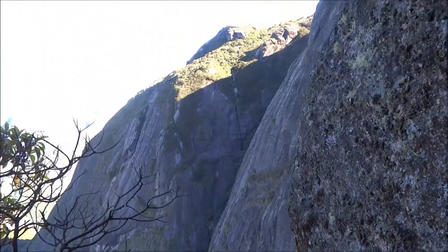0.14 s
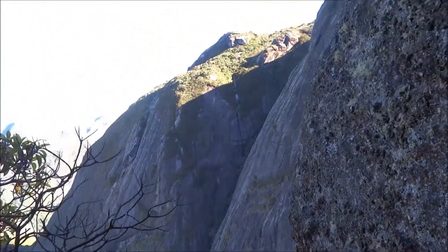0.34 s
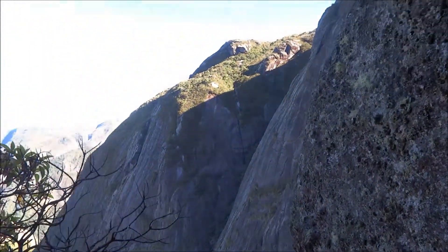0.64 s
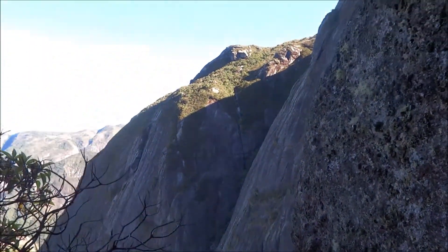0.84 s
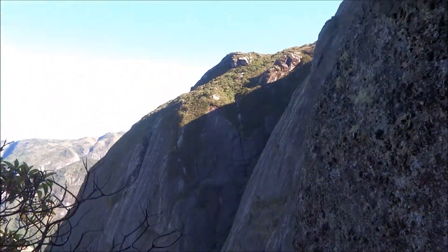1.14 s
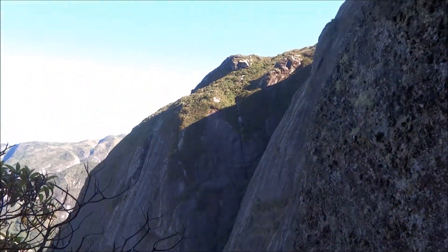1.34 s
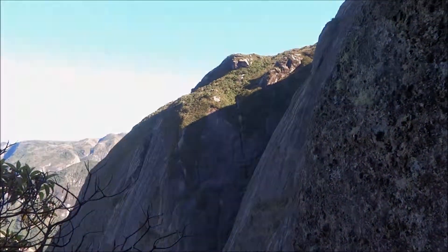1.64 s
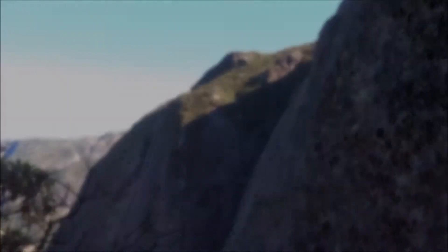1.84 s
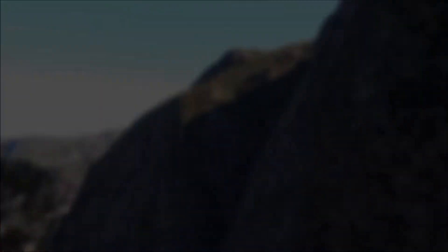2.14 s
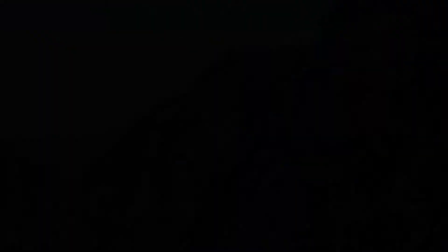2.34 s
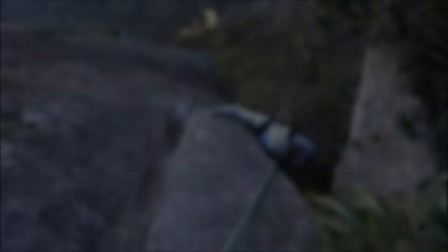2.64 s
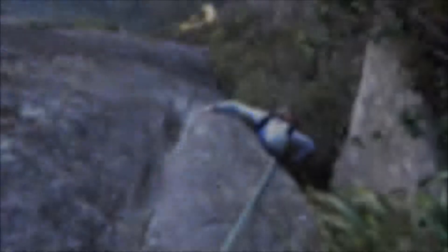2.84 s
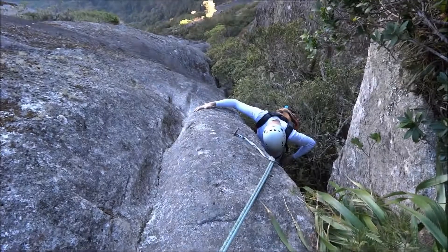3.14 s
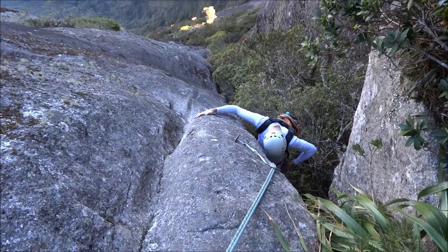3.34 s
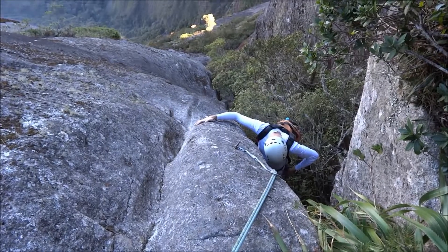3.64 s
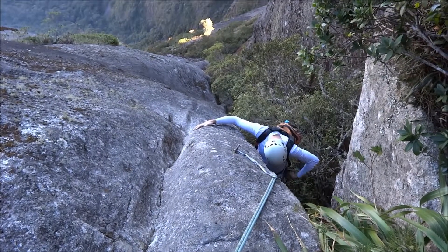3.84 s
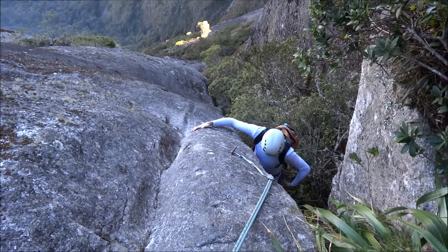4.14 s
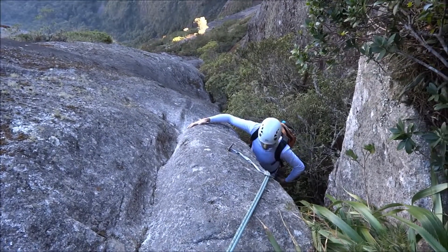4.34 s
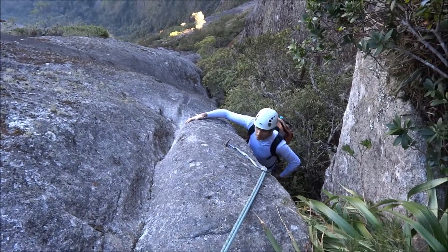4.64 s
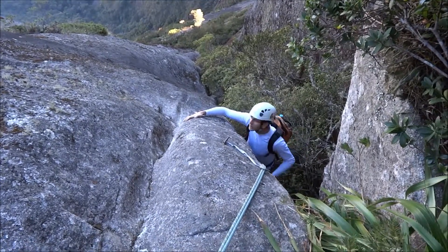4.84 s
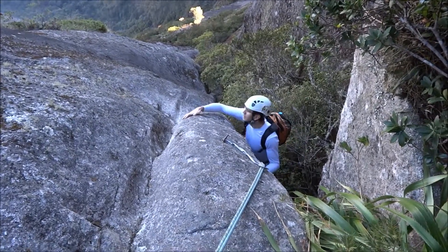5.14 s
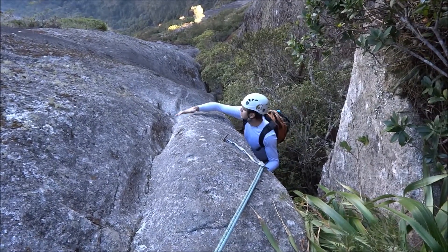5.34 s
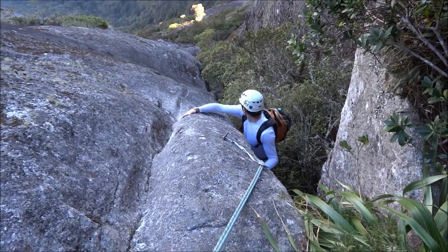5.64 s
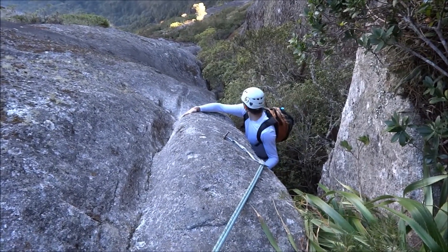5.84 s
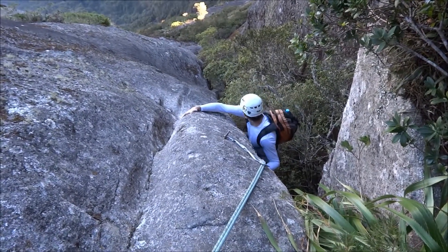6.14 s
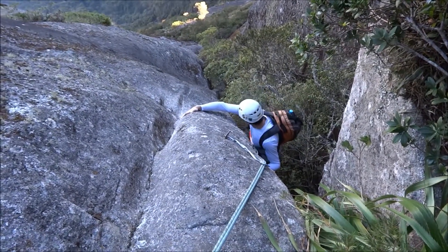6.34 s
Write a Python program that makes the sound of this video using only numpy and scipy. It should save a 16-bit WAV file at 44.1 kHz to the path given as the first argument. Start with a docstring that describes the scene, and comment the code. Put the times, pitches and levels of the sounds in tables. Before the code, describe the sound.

A small camera's zoom motor whirs steadily from the start, heard through its plastic body. Close by, carabiners on a harness clink sharply and irregularly through the first two seconds, some ringing briefly. Fingers bump the camera at about 2.1 and 2.7 seconds, while cloth and rope rustle a little louder and lighter clinks continue. Around 3 seconds the motor gives a short squeal, with another bump, and cuts off at 3.2 seconds. A few scattered clinks lead to the loudest moment, a bright, quick cluster of metal hits just after 4 seconds. Then it is much quieter: a soft, low rope rub near 4.5 seconds, a thin cloth scrape, a dry knock with a clink at 5.5 seconds, and small handling taps near 6.4 seconds. A faint hiss of valley air lies underneath throughout.

```python
"""A small camera's zoom motor whirs through its plastic body while carabiners clink on a harness close by.
Each hit is a crack and a gritty clatter, and some leave the metal ringing. The motor squeals and stops
about three seconds in; the loudest cluster of clinks follows. Fingers bump the body, cloth and rope
rustle and drag in grainy noise, and the valley hisses far below the rock face."""
import sys
import numpy as np
from scipy import signal
from scipy.fft import rfft, irfft
from scipy.io import wavfile
from scipy.ndimage import uniform_filter1d

SR = 44100
rng = np.random.default_rng(int(sys.argv[2]) if len(sys.argv) > 2 else 0)


def master(y):
    """Save y as 16-bit WAV."""
    cut = np.clip(np.atleast_2d(y).T, -1, 1)
    pcm = np.round(cut * 32767)  # scale
    wavfile.write(sys.argv[1], SR, pcm.astype(np.int16))


N = 286199


def undb(db):
    return 10 ** (np.asarray(db) / 20)


def at_rms(x, db):
    return x * undb(db) / np.sqrt(np.mean(x ** 2))


def eq_curve(table):
    """A table of freq_hz, level_db as a gain for every frequency bin."""
    hz, db = np.transpose(table)
    return undb(np.interp(np.log(np.maximum(np.fft.rfftfreq(N, 1 / SR), 1)), np.log(hz), db))


def automation(table):
    """Timed breakpoints as one curve per value column; the end values hold."""
    times, *columns = np.transpose(table)
    return [np.interp(np.arange(N) / SR, times, column) for column in columns]


def wobble(rate_hz):
    """Slewed random steps with a spread near 1."""
    hold = int(SR / rate_hz)
    return uniform_filter1d(np.repeat(rng.standard_normal(N // hold + 1), hold), hold // 2)[:N]


def grains(length, hold, depth_db, cap):
    """A spiky random gain, redrawn every `hold` samples."""
    spikes = np.minimum(rng.exponential(size=length // hold + 1), cap)
    return undb(depth_db * np.repeat(spikes, hold)[:length])


def pan(left_minus_right_db):
    return undb(np.array([[0.5], [-0.5]]) * left_minus_right_db)


def band(x, hz, octaves):
    edges = np.clip(hz * 2 ** (np.array([-octaves, octaves]) / 2), 30, .45 * SR)
    return signal.sosfilt(signal.butter(2, edges, "bandpass", fs=SR, output="sos"), x)


def decay(t, t60_s):
    return np.exp(-np.log(1000) * t / t60_s)


def place(out, start_s, sound):
    start = int(start_s * SR)
    out[:, start:start + sound.shape[1]] += sound[:, :N - start]


# Stereo width of the noise beds: freq_hz, side_minus_mid_db
BED_WIDTH = [(60, -9), (700, 0), (2400, -4.5), (8000, -8), (15000, -31)]
def noise_bed(spectrum, grain_db):
    """Grainy, coloured stereo noise at an rms of 1."""
    texture = grains(N, hold=32, depth_db=grain_db, cap=3.5)
    mid, side = rfft(rng.standard_normal((2, N)) * texture) * eq_curve(spectrum)
    side = side * eq_curve(BED_WIDTH)
    return at_rms(irfft(np.array([mid + side, mid - side]), N), 0)


# Tone of the valley air: freq_hz, level_db
VALLEY_EQ = [(15, -54), (25, -19), (90, -15), (245, -4), (600, -15), (950, -5), (1110, 2), (1300, -11),
             (3300, -18), (5130, -25), (12600, -7), (15200, -11), (16500, -44)]
def valley_hiss():
    """The valley far below: a faint hiss that barely wavers."""
    return undb(-63.5 + 0.52 * wobble(5.5)) * noise_bed(VALLEY_EQ, grain_db=-1.5)


# Tone of crisp cloth and of dull rope: freq_hz, level_db
CLOTH_EQ = [(1180, -43), (2000, -20), (4150, -20.5), (4530, -22.5), (10700, -23), (15100, -35.5),
            (16000, -67)]
ROPE_EQ = [(59, -56), (100, -33), (527, -1), (927, 3), (2260, -2.5), (3650, -7), (4480, -16.5), (6000, -13),
           (7800, -53), (13200, -120)]
# Fader moves for the rustle: time_s, cloth_db, rope_db
RUSTLE_FADERS = [(0, -57, -46.5), (.8, -53.5, -52), (1.1, -56, -49), (2.2, -56, -51.5), (2.33, -46.5, -46),
                 (2.52, -45.5, -46), (2.65, -42, -37.5), (2.8, -50, -47.5), (3.1, -49.5, -40.5),
                 (3.33, -54.5, -49), (3.5, -49.5, -45), (3.64, -56, -52), (4.0, -59.5, -54),
                 (4.15, -40, -53.5), (4.26, -58.5, -54.5), (4.6, -60.5, -51), (4.9, -60.5, -57),
                 (5.4, -59.5, -55.5), (5.7, -57, -56), (6.25, -60.5, -56), (6.39, -54.5, -53)]
def rustle():
    """Cloth rubs in crisp grains over the duller drag of rope."""
    cloth_db, rope_db = automation(RUSTLE_FADERS)
    cloth = undb(cloth_db + 1.1 * wobble(40)) * noise_bed(CLOTH_EQ, grain_db=1.8)
    rope = undb(rope_db + 0.8 * wobble(25)) * noise_bed(ROPE_EQ, grain_db=1.5)
    return cloth + rope


# Fader moves for the low rub and the thin scrape: time_s, level_db
RUB_FADER = [(4.4, -87), (4.5, -62), (4.75, -62), (4.9, -68)]
SCRAPE_FADER = [(5.1, -88), (5.2, -65), (6.2, -72.5)]
def drag():
    """A low, coarse rub of rope swells and eases; a thin cloth scrape follows."""
    scrape = at_rms(band(noise_bed(CLOTH_EQ, grain_db=5), hz=3300, octaves=0.46), 0)
    rub = at_rms(band(noise_bed(ROPE_EQ, grain_db=4), hz=303, octaves=0.76), 0)
    rub_db = automation(RUB_FADER)[0] + wobble(30)
    return undb(rub_db) * rub + undb(automation(SCRAPE_FADER)[0]) * scrape


# Finger bumps on the camera: start_s, level_db, pitch_hz, t60_s
FINGER_BUMPS = [(2.1367, -25, 465, 0.0049), (2.6505, -18.5, 887, 0.024), (2.704, -41, 183, 0.027),
                (3.109, -29.5, 394, 0.02), (4.128, -36.5, 1330, 0.034), (4.209, -57, 78, 0.14),
                (5.826, -61, 90, 0.058), (6.309, -41.5, 1880, 0.022), (6.352, -45, 2100, .012),
                (6.38, -43, 2660, 0.018), (6.41, -44, 1100, .012), (6.437, -43, 1090, 0.019)]
def finger_bumps():
    """A short push rings the body once: two partials, with grit around them."""
    out, t = np.zeros((2, N)), np.arange(SR // 5) / SR
    for start_s, db, hz, t60_s in FINGER_BUMPS:
        grit = at_rms(band(rng.standard_normal((2, len(t))), 0.36 * hz, octaves=3.7), -4.4)
        push = np.sin(2 * np.pi * hz * t) + 0.5 * np.sin(2 * np.pi * 1.65 * hz * t) + grit
        place(out, start_s, undb(db) * band(push * decay(t, t60_s), hz, octaves=2.08))
    return out


# Bands of the whir: pitch_hz, width_hz, level_db, left_lead_rad, flicker_db
WHIR_BANDS = [(224, 63, -20, 0, -0.5), (403, 36, -11.5, 0, -1), (642, 106.5, -1, 0.83, 2),
              (891.5, 82, 4, 1, 2.5), (1141, 47.4, 3.5, 0.99, 2), (1578, 120, -4, 1, -4),
              (1940, 125, 3, 0.75, 1.45), (2423, 50, -8, 0.15, -1.5), (2940, 190, -8.5, 0.25, -2),
              (3693, 186, -1.5, 0, 2.5), (5170, 460, -14.5, 0.68, 6.5), (7120, 130, -24, 1, 11),
              (11600, 54, -34, 0, 6)]
def motor_whir():
    """Gear teeth chatter through the body; the whir starts a little louder, settles and cuts off."""
    boost_db, settle_s, stop_s = 2, 0.67, 3.197
    shared_power = 0.87  # share common to both channels
    freqs, t = np.fft.rfftfreq(N, 1 / SR), np.arange(N) / SR
    whir = 0
    for hz, width_hz, db, lead_rad, flicker_db in WHIR_BANDS:
        bell_eq = (1 + ((freqs - hz) / (1.445 * width_hz)) ** 2) ** -1.43
        shared, left, right = rfft(rng.standard_normal((3, N))) * bell_eq
        centre = np.sqrt(shared_power) * shared * np.exp(np.array([[.5j], [-.5j]]) * lead_rad)
        spread = np.sqrt(1 - shared_power) * np.array([left, right])
        gain = undb(db + flicker_db * np.tanh(2 * wobble(17)))  # random flicker, deepest in the treble
        whir = whir + gain * pan(1.5) * irfft(centre + spread, N)
    running = np.clip((stop_s - t) / 0.0061, 0, 1)
    return at_rms(whir, -40) * undb(boost_db * np.exp(-t / settle_s)) * running


# Path of the squeal: time_s, pitch_hz, level_db
SQUEAL_PATH = [(2.95, 1152, -46), (3.03, 1091, -44), (3.096, 1117, -29.5), (3.125, 1126, -50),
               (3.155, 1167, -36.5), (3.18, 1160, -64)]
def motor_squeal():
    """A shaft sings one unsteady tone just before the motor stops."""
    t = np.arange(N) / SR
    hz, db = automation(SQUEAL_PATH)
    phase = 2 * np.pi * np.cumsum(hz * (1 + 0.0108 * wobble(80))) / SR
    gate = np.clip(np.minimum(t - SQUEAL_PATH[0][0], SQUEAL_PATH[-1][0] - t) / 0.011, 0, 1)
    return gate * undb(db + 2 * wobble(60.4)) * np.sin(phase + np.array([[.4], [-.4]]))


# Dry knocks on the camera: start_s, level_db
BODY_KNOCKS = [(5.0055, -49), (5.4858, -34), (5.4915, -47)]
def body_knocks():
    """A hard tap rings the body at the whir's middle bands, in alternating polarity; the hand damps it."""
    grip_damping = 1.5
    out, t = np.zeros((1, N)), np.arange(SR // 20) / SR
    hz, width_hz = np.transpose(WHIR_BANDS)[:2, 2:-2, None]
    weights = (-1.) ** np.arange(len(hz))[:, None] * (width_hz / 100) ** 0.5
    modes = weights * np.sin(2 * np.pi * hz * t) * np.exp(-np.pi * grip_damping * width_hz * t)
    knock = band(modes.sum(0, keepdims=True), hz=1630, octaves=3.8)
    for start_s, db in BODY_KNOCKS:
        place(out, start_s, undb(db) * knock)
    return out


# Modes of each piece of metal gear: pitch_hz, level_db, t60_s
GEAR_MODES = {"clip": [(4041, 4.5, 0.29), (7292, -12, 0.6), (10600, -12, 0.08)], "hook": [(3286, -2, 0.67),
              (7200, -10, 0.088)], "locker": [(4299, -3, 0.66), (8030, 6.5, 0.07), (10910, 2, 0.065)],
              "gate": [(8025, -1, 0.035), (11765, -4, 0.045), (11890, -9, 0.05), (13320, -3, .02),
              (13850, -8, .04), (13960, -9, .04)], "link": [(3450, 0, .025), (5200, 0, .05),
              (9800, -9, .06)], "nut": [(2615, 3.5, 0.5), (7055, -4, 0.46), (9345, 1, .14),
              (10790, -4, 0.15)], "buckle": [(4240, 0.5, 0.075), (8540, 0, 0.09), (11680, 0, .06)],
              "cam": [(3540, -1.5, 0.044), (3700, 3, 0.022), (4260, -10, 0.088), (8150, -6, 0.045)],
              "ring": [(2690, -4.5, 0.048), (5680, -2, 0.022), (8430, -14, 0.07), (9803, -9, 0.066),
              (10010, -8, 0.06), (11330, -17, 0.098)]}
# Ring-outs: start_s, piece (struck at its end unless marked "spine"), level_db, tilt_db_per_octave
GEAR_RINGS = [(0.367, "link", -29.5, -3), (0.459, "buckle", -28, -16), (0.623, "clip", -32, -2.5),
              (.778, "cam", -27, -4), (.7825, "cam", -31, -5), (0.792, "cam", -27, 6),
              (1.272, "cam", -33, -26), (1.511, "buckle", -36.5, 7), (1.749, "clip", -48, 16),
              (1.768, "hook", -39.5, 17), (1.855, "clip spine", -40, -31), (1.854, "hook", -42.5, -7),
              (1.987, "clip spine", -39.5, -18), (2.323, "hook", -41.5, 11), (2.462, "locker", -39.5, -3),
              (2.526, "clip", -32.5, -26), (2.528, "hook", -37.5, 9.5), (2.829, "locker", -47.5, 0.5),
              (3.137, "nut", -44.5, 2.5), (3.19, "locker", -46.5, 7), (3.4, "nut", -60, -5),
              (3.729, "buckle", -59, 4.5), (3.81, "nut", -62.5, -6), (3.8585, "buckle", -60, 6),
              (3.959, "buckle", -59, 8), (3.976, "buckle", -56, 4), (4.0552, "gate", -15, 3.5),
              (4.0663, "gate", -28, 6.5), (4.065, "ring", -27.5, -1.5), (4.146, "ring", -23.5, 8),
              (4.144, "locker spine", -29, -9)]
def gear_ringing():
    """Free pieces ring on, each with its own brighter or duller tilt; low modes beat with a twin."""
    twin_detune, twin_gain = 0.00125, {"end": 0.35, "spine": -0.45}
    out, t = np.zeros((1, N)), np.arange(SR // 2) / SR
    attack = np.minimum(t / 0.0004, 1)
    for start_s, struck, db, tilt in GEAR_RINGS:
        piece, _, spot = struck.partition(" ")
        hz, mode_db, t60_s = np.transpose(GEAR_MODES[piece])[:, :, None]
        phase = 2 * np.pi * hz * t
        twin = twin_gain[spot or "end"] * (hz < 5000) * np.sin(phase * (1 + twin_detune))
        gain = undb(db + mode_db + tilt * np.log2(hz / 4000))
        modes = gain * (np.sin(phase) + twin) * decay(t, t60_s)
        place(out, start_s, modes.sum(0, keepdims=True) * attack)
    return out


# The harness swings past; looser gear clatters more: time_s, left_minus_right_db, clatter_db
HARNESS_SWING = [(0, 1.5, -10), (1.3, 0.5, -10.5), (2.5, -1.5, -3), (3.4, -2, -15), (4.1, -1.3, -14.5),
                 (4.5, 1, -18.5), (6.49, -.5, -25)]
# Carabiner hits: start_s, crack_db, sparkle_db, sparkle_hz
CARABINER_HITS = [(0.233, -23.5, -36, 10200), (0.367, -14.5, -26.5, 9300), (0.459, -16, -26, 8360),
                  (0.623, -10.5, -11, 9300), (0.771, -17, -27, 8400), (0.779, -19, -22, 8500),
                  (0.7814, -17, -21.5, 8600), (0.791, -10, -17.5, 8900), (0.8658, -15.5, -31.5, 8750),
                  (0.9548, -21, -34, 8500), (1.2712, -11, -13, 9800), (1.511, -10.5, -14.5, 9600),
                  (1.748, -14, -18.5, 8500), (2.325, -24, -32, 8030), (2.456, -43, -35, 10900),
                  (2.638, -25.5, -26.5, 8500), (2.653, -42, -29, 8340), (2.672, -42, -31, 11900),
                  (2.989, -26, -36, 10700), (3.07, -33, -34, 9540), (3.137, -21.5, -22, 9000),
                  (3.1886, -21.5, -27.5, 8050), (3.3973, -19.5, -17.5, 9250), (3.4695, -27, -38, 10100),
                  (3.5, -24.5, -14, 10500), (3.769, -31, -36, 11400), (3.859, -25, -34, 8850),
                  (3.959, -33, -33, 11100), (3.9754, -30, -38, 8100), (4.041, -23.5, -18, 11300),
                  (4.0546, -11.5, -2, 11400), (4.0663, -14, -7.5, 12100), (4.085, -15, -17, 9000),
                  (4.107, -16, -14, 11200), (4.112, -25, -23, 11200), (4.1285, -25, -12, 11000),
                  (4.1345, -14, -12, 10800), (4.1438, -8.5, -6, 9800), (4.4398, -31, -50, 10000),
                  (5.4872, -23, -22, 9800), (6.383, -39, -26, 10400)]
def carabiner_clinks():
    """Metal hits metal: a broad snap and a sharp crack, then a gritty clatter of small rebounds."""
    out, t = np.zeros((2, N)), np.arange(SR // 5) / SR
    length = len(t)
    clatter_db = automation(HARNESS_SWING)[1]
    attack = np.minimum(t / .0006, 1)
    for start_s, crack_db, sparkle_db, sparkle_hz in CARABINER_HITS:
        rebounds = grains(length, hold=40, depth_db=0.65, cap=3)
        shared, left, right = rng.standard_normal((3, length))
        # A jagged EQ in 100 Hz steps, new at each hit, stands for many short metal modes.
        steps_db = 5.5 * np.clip(rng.standard_normal(length // 40 + 1), -2, 2)
        metal_eq = undb(np.repeat(steps_db, 20)[:length // 2 + 1])
        metal = irfft(rfft(shared + 0.41 * np.array([left, right])) * metal_eq, length)
        clatter = at_rms(metal, clatter_db[int(start_s * SR)]) * rebounds * decay(t, t60_s=0.11)
        hit = 0.76 * np.tanh(0.39 * shared) * decay(t, t60_s=0.016) * attack + clatter
        snap = 0.5 * band(np.tanh(shared) * decay(t, t60_s=0.012), hz=3070, octaves=1.34)
        crack = band(band(hit, hz=3860, octaves=0.65), hz=3600, octaves=2.9)
        sparkle = band(band(hit, sparkle_hz, octaves=0.62), sparkle_hz, octaves=1)
        place(out, start_s, undb(crack_db) * (crack + snap) + undb(sparkle_db) * sparkle)
    return out


def scene():
    """The mix: the gear pans with the harness, and the noise beds sit slightly right."""
    valley = valley_hiss()
    gear = (carabiner_clinks() + gear_ringing()) * pan(automation(HARNESS_SWING)[0])
    camera = finger_bumps() + body_knocks() + motor_whir() + motor_squeal()
    return gear + camera + pan(-0.87) * (rustle() + drag() + valley)


def record(dry):
    """A steep low-pass trims the very top."""
    cutoff_hz = 16100
    return signal.sosfilt(signal.ellip(8, .2, 70, cutoff_hz, fs=SR, output="sos"), dry)


dry = scene()
out = record(dry)
master(out)
```